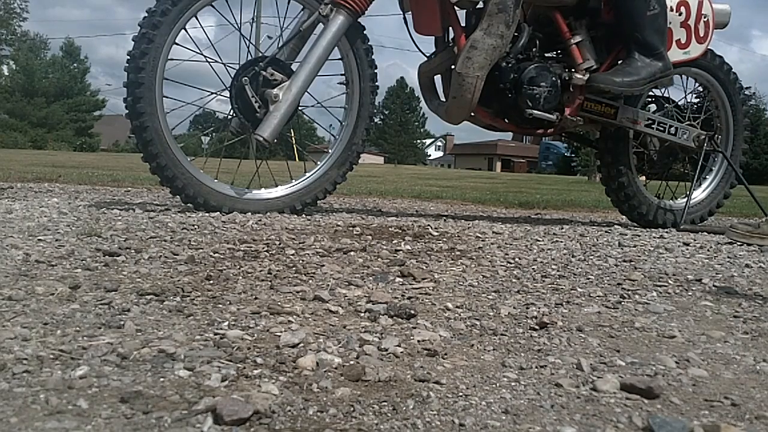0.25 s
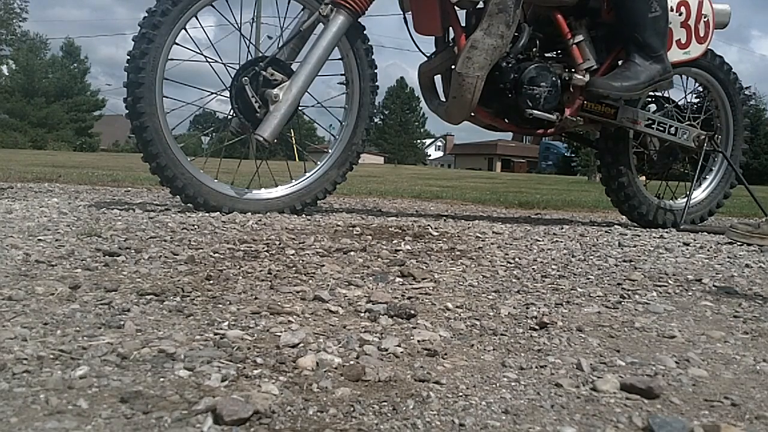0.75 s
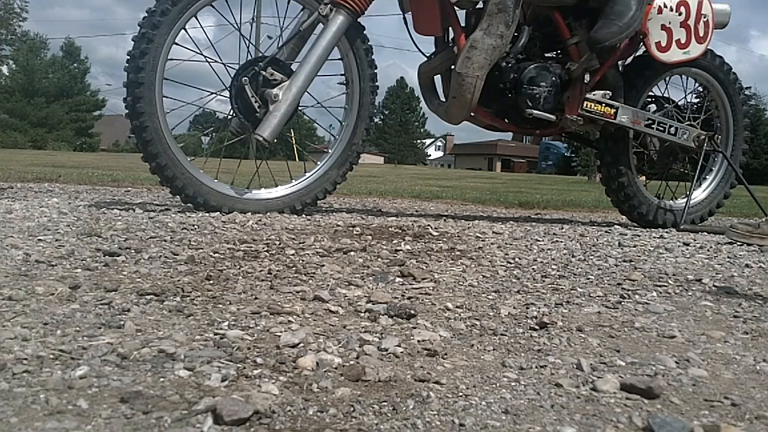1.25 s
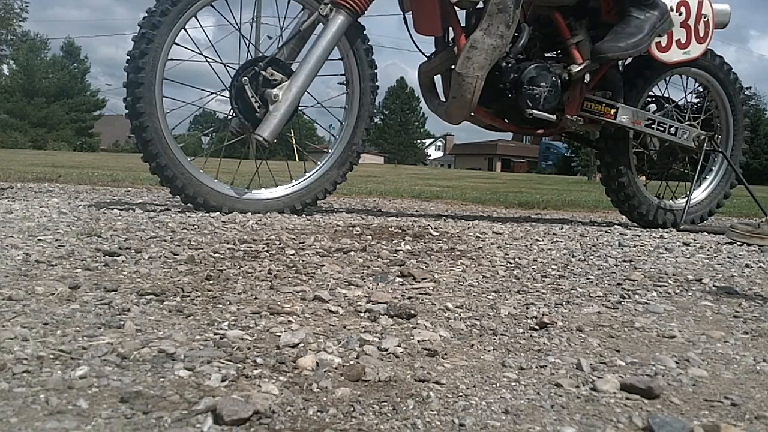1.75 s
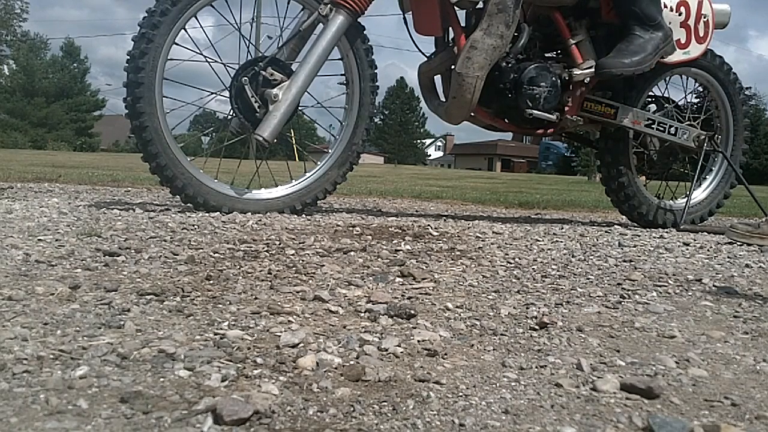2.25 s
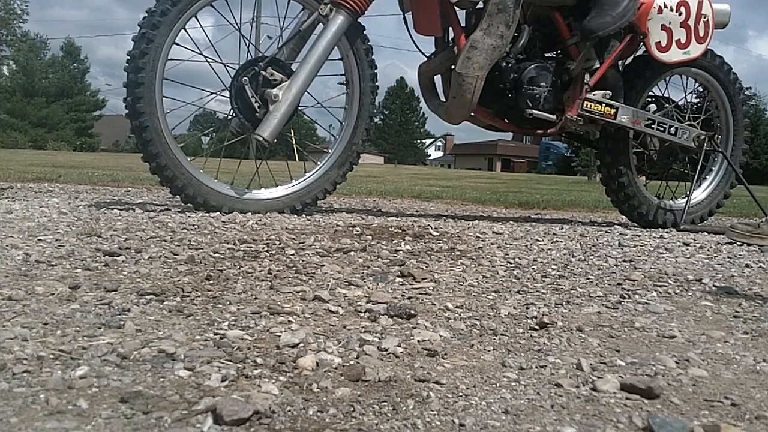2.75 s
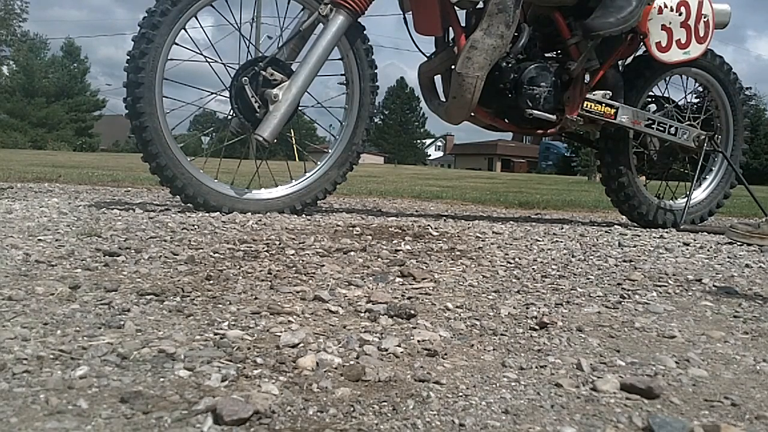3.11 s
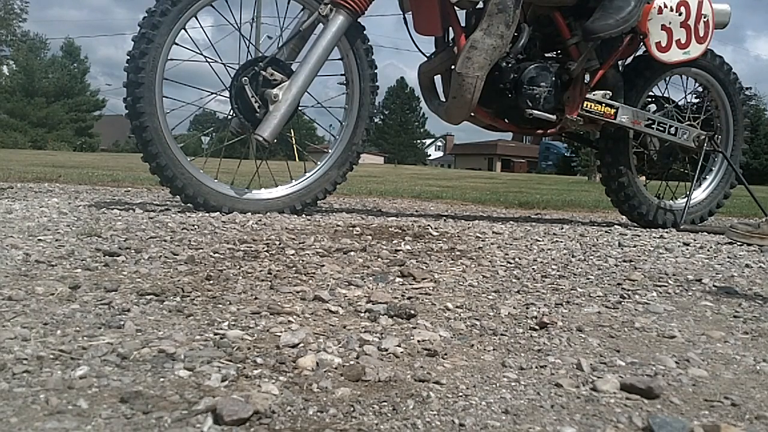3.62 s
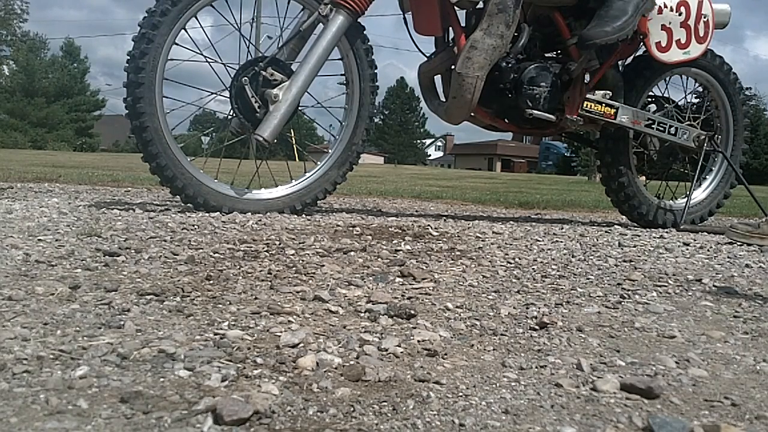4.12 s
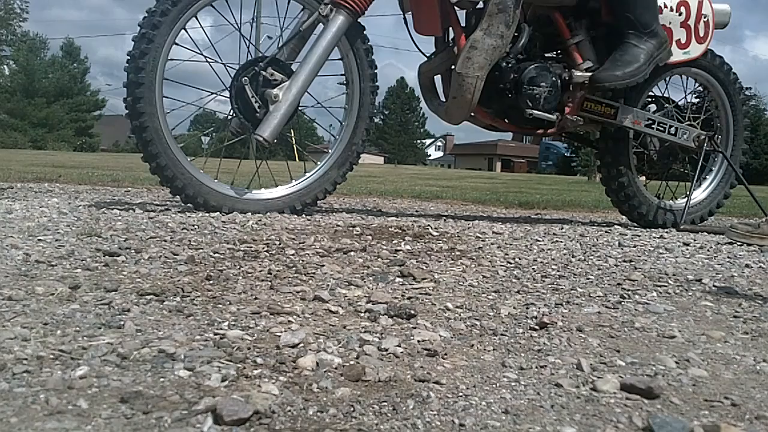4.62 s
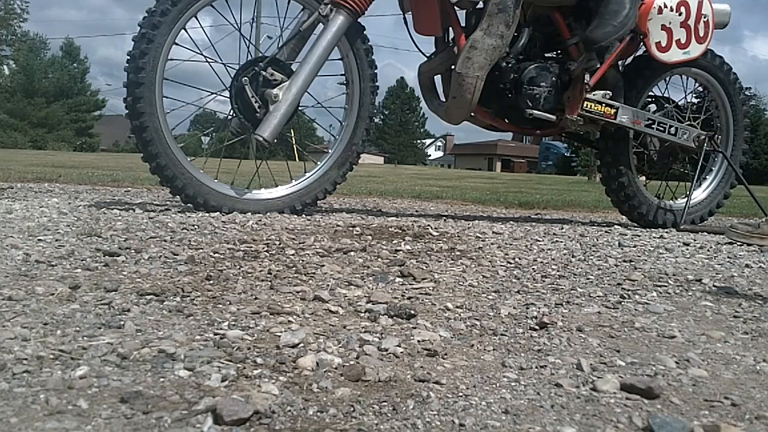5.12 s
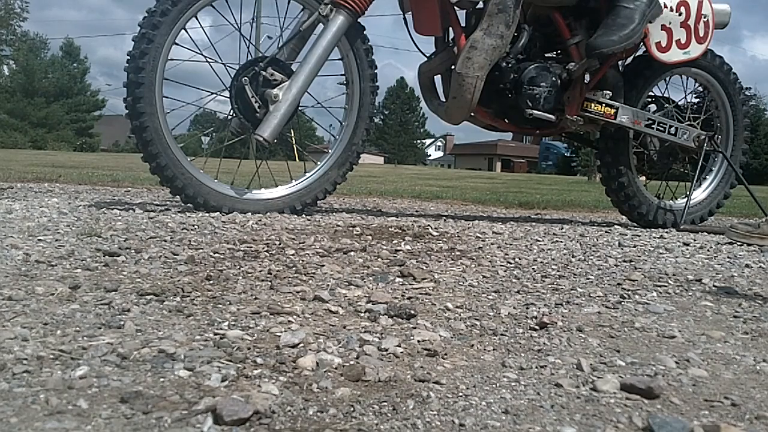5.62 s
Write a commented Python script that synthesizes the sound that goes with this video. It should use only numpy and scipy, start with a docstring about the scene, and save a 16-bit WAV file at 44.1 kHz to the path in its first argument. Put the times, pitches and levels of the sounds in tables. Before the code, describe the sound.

A dirt bike is kicked over without firing: sharp metal double clacks, clunks and dull puffs, with wind on the microphone.

```python
"""Kick-starting a dirt bike that never fires.

A rider kicks over a two-stroke parked on gravel. The ratchet clunks, the piston pushes dull puffs
through the pipe, and three times the lever springs back on its stop with a double clack.
Wind buffets a camera lying on the ground, and a bird chirps faintly."""
import sys
import numpy as np
from scipy import signal
from scipy.fft import rfft, irfft
from scipy.io import wavfile
from scipy.ndimage import uniform_filter1d

SR = 44100
rng = np.random.default_rng(int(sys.argv[2]) if len(sys.argv) > 2 else 0)


def log_audio(samples):
    """Write samples as a 16-bit WAV file to the path given in sys.argv[1]."""
    # one column per channel
    frames = np.atleast_2d(samples).T
    # limit to full scale, then quantise
    limited = np.clip(frames, -1, 1)
    pcm = np.round(limited * 32767).astype(np.int16)
    wavfile.write(sys.argv[1], SR, pcm)


N = 258426
TIME_S = np.arange(N) / SR
RING_S = TIME_S[:SR // 3]

# engine case and frame: pitch_hz, level_db, t60_s
CASE_MODES = [(393, -17, 0.23), (538.3, -9, 0.14), (650, -10.5, 0.15), (853, -10, 0.11), (1165, -3, 0.07),
              (1285, 0.5, 0.014), (1518, -2, 0.037), (1834, -11, 0.042), (2380, -28, 0.047)]
# bright noise of ticks and hisses: freq_hz, level_db
BRIGHT_SPECTRUM = [(500, -15), (2000, 1.5), (3300, 4.5), (4600, 8.5), (6300, 0), (8500, -31), (15000, -17)]


def undb(db):
    """Decibels to gain."""
    return 10 ** (np.asarray(db) / 20)


def unit(x):
    """Scale to rms 1."""
    return x / np.sqrt(np.mean(x ** 2))


def noise(spectrum, size=len(RING_S)):
    """Noise of rms 1, coloured by (freq_hz, level_db) points."""
    hz, db = np.transpose(spectrum)
    bins_hz = np.maximum(np.fft.rfftfreq(size, 1 / SR), 1)
    gain = undb(np.interp(np.log(bins_hz), np.log(hz), db))
    return unit(irfft(rfft(rng.standard_normal(size)) * gain, size))


def walk(rate_hz):
    """Random drift of rms 1."""
    hold = int(SR / rate_hz)
    steps = np.repeat(rng.standard_normal(N // hold + 1), hold)
    return unit(uniform_filter1d(steps, hold)[:N])


def swell(centre_s, sigma_s):
    """Bell-shaped envelope."""
    return np.exp(-np.minimum(((TIME_S - centre_s) / sigma_s) ** 2 / 2, 50))


def rise(tau_s):
    """Exponential attack."""
    return 1 - np.exp(-RING_S / tau_s)


def fade(t60_s):
    """Exponential decay."""
    return np.exp(-np.log(1000) * RING_S / t60_s)


def strike(modes, scatter_db, detune):
    """Ringing modes; each blow lands differently and shares its energy anew."""
    out = 0
    for hz, db, t60_s in modes:
        size, shift, phase = rng.standard_normal(3)
        tone = np.sin(2 * np.pi * (hz * (1 + detune * shift) * RING_S + phase))
        out = out + undb(db + scatter_db * size) * fade(t60_s) * tone
    return out


def add(track, start_s, sound):
    """Mix a sound into the track."""
    start = max(int(start_s * SR), 0)
    track[start:start + len(sound)] += sound[:N - start]


def air(level_db=-55.5, sway_db=-0.5, top_hz=15300):
    """Steady outdoor hush and microphone hiss."""
    # freq_hz, level_db
    hush_spectrum = [(20, -1.5), (75, 6), (130, 0), (300, -6.5), (700, -10.5), (1200, -14.5), (2100, -20.5),
                     (3300, -20), (4700, -17.5), (6300, -20.5), (8000, -33.5), (10000, -25.5),
                     (12000, -25.5), (15000, -29.5)]
    hush = undb(level_db + sway_db * walk(1.87)) * noise(hush_spectrum, N)
    return signal.sosfilt(signal.ellip(10, .2, 70, top_hz, fs=SR, output="sos"), hush)


def wind(breeze_db=-52, fall_db_per_s=1, wander_db=0.5, rumble_db=-1,
         eddy_db=-11, eddy_ref_db=-36, eddy_growth=1.68, uneven_db=3):
    """Breeze and gusts rumble; eddies grow faster than their gust, and the strongest slap."""
    # gusts on the microphone: centre_s, peak_db, sigma_s
    gusts = [(0.505, -46.5, 0.081), (0.693, -32.5, 0.026), (0.806, -35.5, 0.077), (1.206, -38.5, 0.036),
             (1.31, -32.5, 0.028), (1.448, -42.5, 0.053), (1.68, -47.5, 0.045), (3.082, -40.5, 0.044),
             (3.325, -47.5, 0.063), (4.645, -50, 0.041), (5.635, -46.5, .04)]
    # single eddy slaps: centre_s, peak_db
    buffets = [(0.747, -33), (0.793, -32.5), (0.848, -31), (0.885, -30.5), (1.194, -38), (1.315, -39),
               (1.374, -36)]
    # breeze pressure: freq_hz, level_db
    breeze_spectrum = [(10, -1.5), (22, 3.5), (45, -8.5), (75, -5.5), (110, -22.5), (200, -29), (500, -82)]
    # small eddies: freq_hz, level_db
    eddy_spectrum = [(30, 7.5), (100, 7.5), (180, -4), (300, -20), (600, -37), (1500, -79)]
    breeze = undb(breeze_db - fall_db_per_s * TIME_S + wander_db * walk(7))
    gust_power = sum((undb(db) * swell(centre_s, sigma_s)) ** 2 for centre_s, db, sigma_s in gusts)
    wind_db = 10 * np.log10(breeze ** 2 + gust_power)
    pressure = noise(breeze_spectrum, N)
    pressure /= np.sqrt(uniform_filter1d(pressure ** 2, size=SR // 12))  # wind alone sets the strength
    swirl = undb(eddy_ref_db + eddy_growth * (wind_db - eddy_ref_db) + eddy_db + uneven_db * walk(45))
    slaps = sum(undb(db) * swell(centre_s, sigma_s=0.0065) for centre_s, db in buffets)
    return undb(wind_db + rumble_db) * pressure + (swirl + slaps) * noise(eddy_spectrum, N)


def electronics(frame_hz=30, buzz_db=-52):
    """The camera whines once a frame and ticks faintly at twice that rate."""
    # pitch_hz, level_db, offset_frames
    whine_tones = [(11523, -81, 0), (13975, -81, .5), (14580, -88, .5)]
    whine = 0
    for hz, db, offset_frames in whine_tones:
        gate = np.maximum(np.sin(2 * np.pi * (frame_hz * TIME_S + offset_frames)), 0)
        whine = whine + undb(db) * 2 * np.sqrt(gate) * np.sin(2 * np.pi * hz * TIME_S)
    ticks = np.diff(np.floor(2 * frame_hz * TIME_S), prepend=0)
    band = signal.butter(2, (4000, 10000), "band", fs=SR, output="sos")
    return whine + undb(buzz_db) * signal.sosfilt(band, ticks)


def ratchet(rebound_s=.0195, ref_db=-38, db_per_doubling=11, modes_db=-6,
            pawl_knock_db=-8, chatter_db=2.5):
    """Gears knock in the case and bounce once, teeth chattering as they seat; the pawl ticks."""
    # gears take up slack under the boot: start_s, knock_db, teeth_db, rebound_db
    clunks = [(1.003, -45.5, -54, -0.5), (1.478, -36, -36.5, -17), (1.545, -50, -48.5, -15),
              (2.057, -37.5, -38.5, -11.5), (2.590, -44.5, -43, -7), (2.622, -43, -62, -8),
              (4.113, -48.5, -66, -18), (4.706, -46.5, -62, -4), (4.885, -46.5, -50, -6),
              (4.907, -47.5, -37.5, -0.5), (5.216, -50.5, -65, -16), (5.310, -42.5, -39.5, -3),
              (5.583, -48.5, -39.5, -11), (5.683, -38, -39, -14)]
    # hollow knock through the case: freq_hz, level_db
    knock_spectrum = [(100, -6), (280, -3), (450, -0.5), (620, 0), (760, -6.5), (1150, -8), (1600, -21),
                      (2300, -17.5), (4500, -19), (8000, -38), (15000, -42)]
    # pawl slips over one tooth: start_s, level_db
    pawl_ticks = [(0.036, -46.5), (0.971, -50), (1.0078, -31.5), (1.117, -37.5), (1.694, -52.5),
                  (2.119, -50), (2.568, -44), (2.941, -41), (3.722, -50), (4.037, -51.5), (4.797, -36),
                  (4.82, -46)]
    body, teeth = np.zeros(N), np.zeros(N)
    for start_s, knock_db, teeth_db, rebound_db in clunks:
        for delay_s, drop_db in ((0, 0), (rebound_s, rebound_db)):
            # heavier clunks swell and die more slowly
            weight = 2 ** ((knock_db + drop_db - ref_db) / db_per_doubling)
            rise_s, t60_s = .004 * weight, .11 * np.sqrt(weight)
            ring = undb(modes_db) * strike(CASE_MODES, scatter_db=2.5, detune=.012)
            knock = noise(knock_spectrum) * fade(t60_s)
            add(body, start_s + delay_s, undb(knock_db + drop_db) * rise(rise_s) * (knock + ring))
            bite = rise(0.81 * rise_s) * fade(0.54 * t60_s)
            add(teeth, start_s + delay_s, undb(teeth_db + drop_db) * bite * noise(BRIGHT_SPECTRUM))
    snap = rise(tau_s=0.0012) * fade(t60_s=0.028)
    for start_s, db in pawl_ticks:
        add(teeth, start_s, undb(db) * snap * noise(BRIGHT_SPECTRUM))
        add(body, start_s, undb(db + pawl_knock_db) * snap * noise(knock_spectrum))
    return body + teeth * undb(chatter_db * walk(600))


def bird(bend=1.2):
    """Thin gliding whistles: two voices at once in the first calls, a rasp in the last."""
    # start_s, length_s, start_hz, end_hz, level_db, rasp_hz
    chirps = [(0.424, .045, 5060, 4720, -60, 10), (0.431, 0.037, 3000, 3520, -63, 10),
              (0.563, 0.044, 5100, 4840, -60, 10), (0.576, 0.036, 3000, 3580, -62, 10),
              (1.769, 0.059, 4100, 3970, -59.5, 310), (1.805, 0.0284, 3850, 2660, -49, 120)]
    out = np.zeros(N)
    for start_s, length_s, start_hz, end_hz, db, rasp_hz in chirps:
        along = np.linspace(0, 1, int(length_s * SR))
        hz = start_hz + (end_hz - start_hz) * along ** bend + rasp_hz * walk(980)[:len(along)]
        whistle = np.sin(2 * np.pi * np.cumsum(hz) / SR)
        add(out, start_s, undb(db) * np.sin(np.pi * along) * whistle)
    return out


def gears(pitch_hz=597, stage_width_hz=92):
    """Gears hum in the case as the crank coasts at the bottom of each kick."""
    # centre_s, level_db, sigma_s
    coasts = [(1.029, -52, .02), (2.61, -58, 0.02), (4.925, -57.5, 0.032)]
    band = signal.iirpeak(pitch_hz, pitch_hz / stage_width_hz, SR)
    hum = unit(signal.lfilter(*band, signal.lfilter(*band, rng.standard_normal(N))))
    return hum * sum(undb(db) * swell(centre_s, sigma_s) for centre_s, db, sigma_s in coasts)


def lever(lead_in_s=0.0035, ping_peak_s=0.00061, case_db=-30, modes_db=-7):
    """The spring throws the lever on its stop: a crack and ping, then the case rings and clatters."""
    # hits and rebounds: start_s, ping_hz, ping_db, contact_db, lead_in_db
    clacks = [(1.0922, 5820, -13, -16, -38), (1.161, 6000, -13.5, -16, -29),
              (2.7008, 5850, -19, -18.5, -29), (2.8073, 4800, -23, -19, -31),
              (5.007, 5950, -13, -15, -28.5), (5.0818, 6050, -18, -17, -34)]
    # bare steel contact: freq_hz, level_db
    crack_spectrum = [(300, -34), (1200, -20), (2200, -0.5), (3300, -29), (4500, 10), (6500, 6), (8500, -5),
                      (13000, 4), (16000, -16)]
    # steel lever: pitch_hz, level_re_contact_db, t60_s
    lever_modes = [(3140, -20, 0.035), (3980, -10.5, 0.018), (4200, -15, 0.037), (4700, -13, 0.011),
                   (4935, -7.5, 0.017), (6340, -23, 0.055), (7140, -25.5, 0.041), (10270, -13.5, 0.0072),
                   (13080, -14.5, 0.01)]
    # case clatter: freq_hz, level_db
    clatter_spectrum = [(100, -11), (250, 3.5), (550, -0.5), (1250, 6), (2000, 1.5), (4300, 1.5),
                        (6500, -10.5), (9000, -16), (15000, -21)]
    out = np.zeros(N)
    # the ping is choked as the lever seats
    seat = (RING_S / ping_peak_s) ** 2 * np.exp(2 * (1 - RING_S / ping_peak_s))
    lead_in = (RING_S / lead_in_s) ** 2 * (RING_S < lead_in_s)  # brief hiss swelling into each clack
    for start_s, ping_hz, ping_db, contact_db, lead_in_db in clacks:
        ping = undb(ping_db) * seat * np.sin(2 * np.pi * ping_hz * RING_S)
        steel = noise(crack_spectrum) * fade(t60_s=0.0054)
        steel += strike(lever_modes, scatter_db=1.5, detune=.004)
        steel *= undb(contact_db) * rise(tau_s=.0005)
        case = undb(modes_db) * strike(CASE_MODES, scatter_db=1.5, detune=.006)
        case += noise(clatter_spectrum) * fade(t60_s=0.06)
        case *= undb(case_db) * rise(tau_s=0.00026)
        add(out, start_s, ping + steel + case)
        add(out, start_s - lead_in_s, undb(lead_in_db) * lead_in * noise(BRIGHT_SPECTRUM))
    return out


def exhaust(waver=0.0344, flutter=0.14, hiss_db=-13, boom_ref_db=-42, sigma_ref_s=0.011,
            gas_ref_db=-53.5, gas_db_per_doubling=5, gas_follow=0.33, gas_stretch=1.7):
    """Unfired strokes: the pipe booms at its lowest resonance, gas rushes through the upper ones."""
    # piston pushes: centre_s, pitch_hz, boom_db, sigma_s
    puffs = [(1.418, 190, -44, 0.0065), (1.519, 230, -44, 0.0074), (2.904, 185, -38.5, 0.0035),
             (4.119, 179, -46, .005), (4.602, 135, -41, 0.0047), (4.672, 214, -34, 0.0095),
             (4.779, 184, -33.5, 0.011), (4.802, 246, -34, .018), (5.223, 200, -42.5, 0.0053),
             (5.346, 225, -41.5, 0.01), (5.728, 245, -40, 0.0069)]
    # upper pipe resonances: pitch_hz, width_hz, level_db
    pipe_modes = [(324, 40, 7), (478, 150, 1), (630, 99, -1.5), (1010, 60, -3), (1200, 390, -16)]
    rush = 0
    for hz, width_hz, db in pipe_modes:
        band = signal.iirpeak(hz, hz / width_hz, SR)
        rush = rush + undb(db) * signal.lfilter(*band, rng.standard_normal(N))
    rush = unit(rush) + undb(hiss_db) * noise(BRIGHT_SPECTRUM, N)
    clock_s = np.cumsum(1 + waver * walk(90)) / SR
    out = np.zeros(N)
    for centre_s, hz, boom_db, sigma_s in puffs:
        boom = np.sin(2 * np.pi * hz * clock_s)
        # a longer push moves more gas
        gas_db = gas_ref_db + gas_db_per_doubling * np.log2(sigma_s / sigma_ref_s)
        gas_db += gas_follow * (boom_db - boom_ref_db)
        out += undb(boom_db) * swell(centre_s, sigma_s) * boom
        out += undb(gas_db) * swell(centre_s, gas_stretch * sigma_s) * rush * (1 + flutter * boom)
    return out


def yard(x, wet_db=-24):
    """Faint, dull scatter from gravel, lawn and trees."""
    # freq_hz, level_db
    spectrum = [(100, -6), (600, 0), (1200, -3), (3300, -3), (4300, -7), (6000, -15), (15000, -20)]
    tail = noise(spectrum) * fade(t60_s=0.46) * rise(tau_s=0.0077)
    tail /= np.sqrt(np.sum(tail ** 2))
    return x + undb(wet_db) * signal.fftconvolve(x, tail)[:N]


def scene():
    """Bike and bird in the open yard, under wind and hush."""
    bike = lever() + ratchet() + gears() + exhaust()
    return (yard(bike + bird()) + wind() + air())[None]


def record(dry, top_hz=16300):
    """The camera notches a few bands, adds its own whine and cuts the top."""
    # centre_hz, width_hz
    notches = [(2720, 990), (5500, 630), (7950, 600), (10930, 940)]
    for hz, width_hz in notches:
        dry = signal.lfilter(*signal.iirnotch(hz, hz / width_hz, SR), dry)
    lowpass = signal.ellip(8, .2, 70, top_hz, fs=SR, output="sos")
    return signal.sosfilt(lowpass, dry + electronics())


dry = scene()
out = record(dry)
log_audio(out)
```